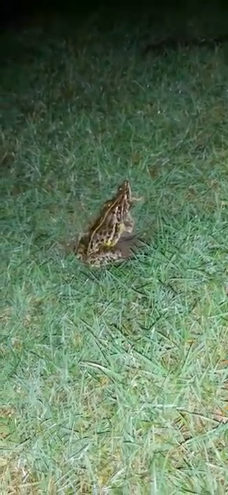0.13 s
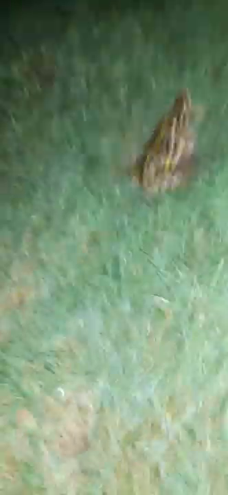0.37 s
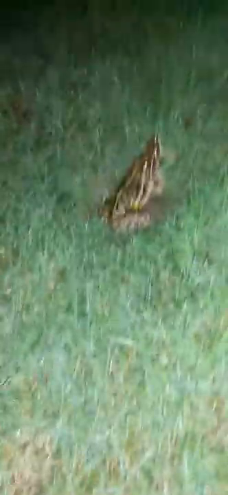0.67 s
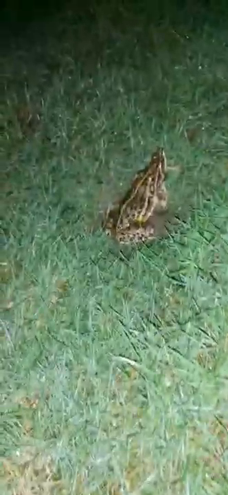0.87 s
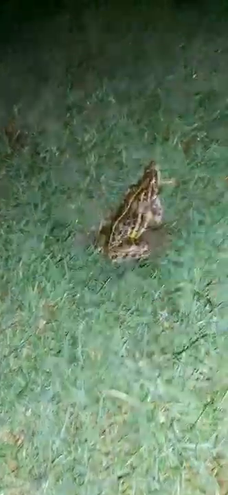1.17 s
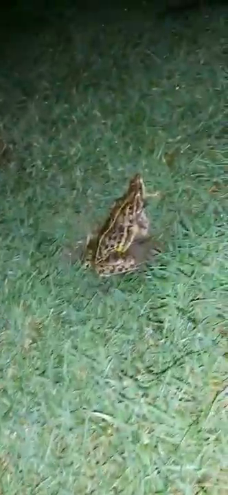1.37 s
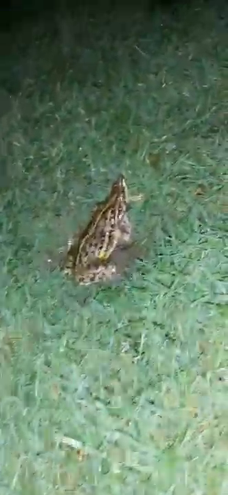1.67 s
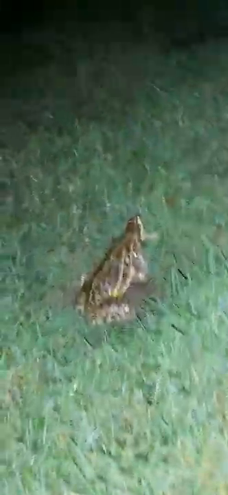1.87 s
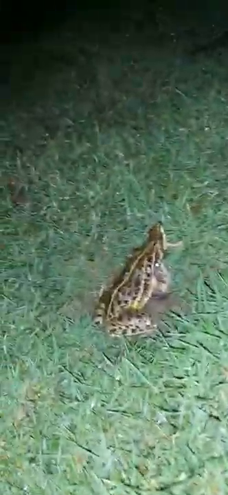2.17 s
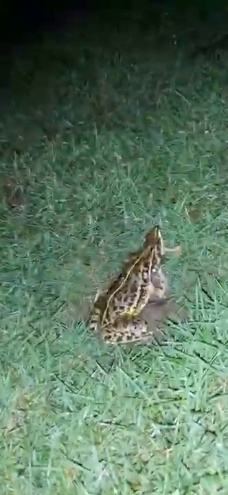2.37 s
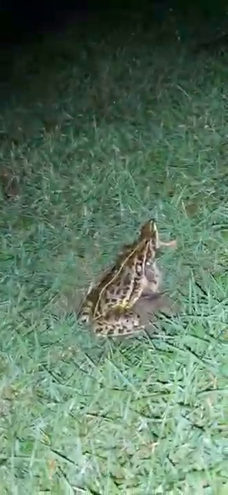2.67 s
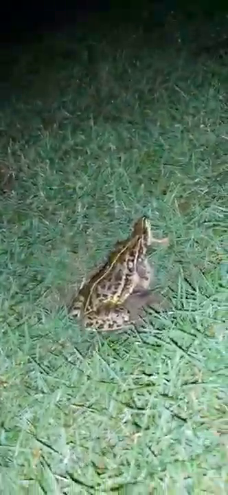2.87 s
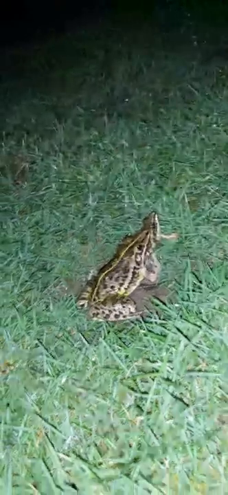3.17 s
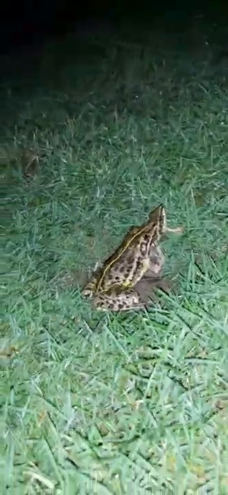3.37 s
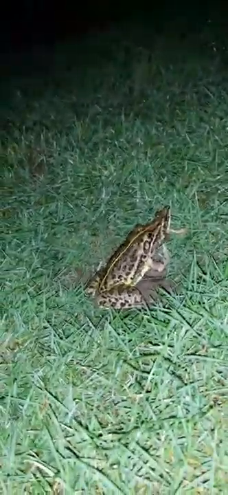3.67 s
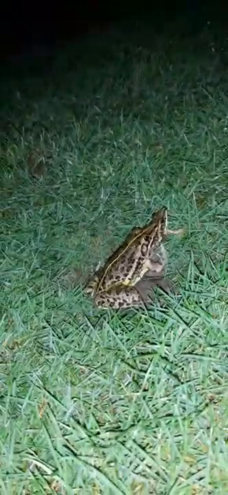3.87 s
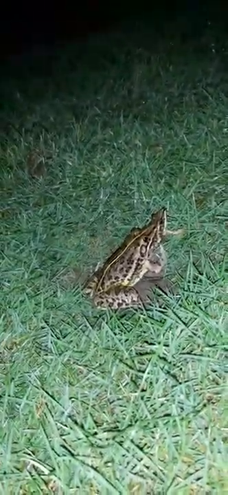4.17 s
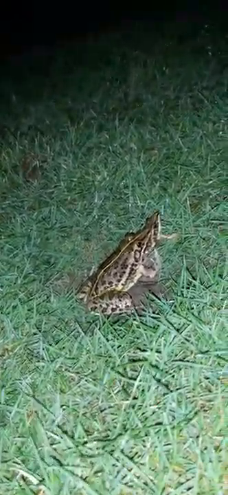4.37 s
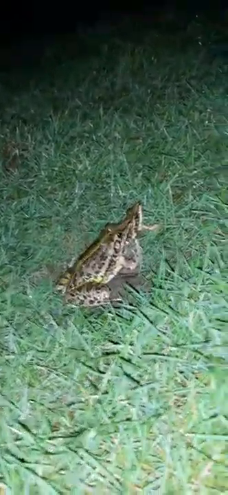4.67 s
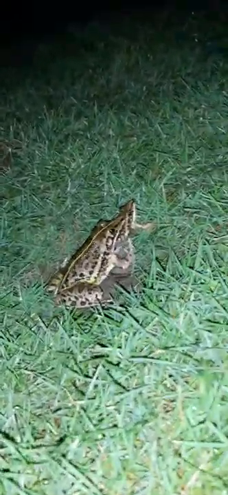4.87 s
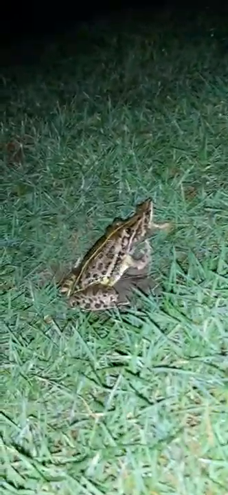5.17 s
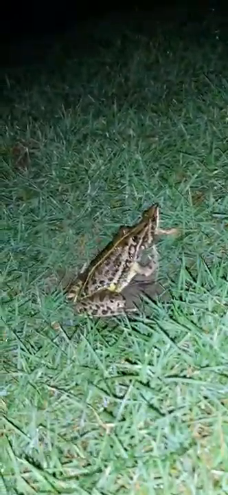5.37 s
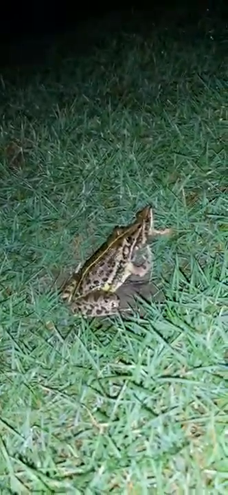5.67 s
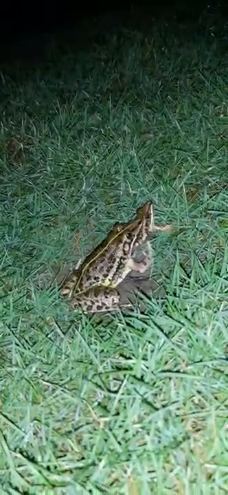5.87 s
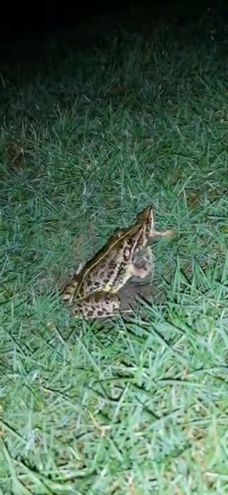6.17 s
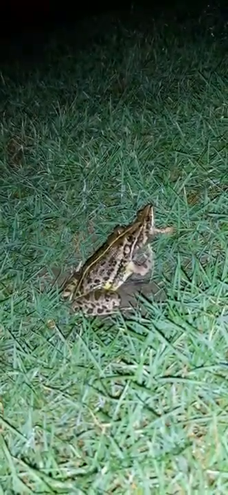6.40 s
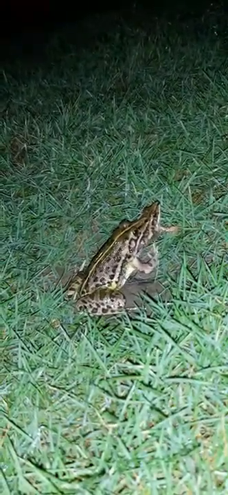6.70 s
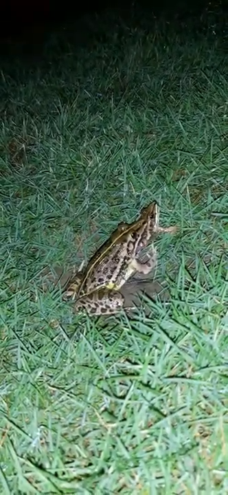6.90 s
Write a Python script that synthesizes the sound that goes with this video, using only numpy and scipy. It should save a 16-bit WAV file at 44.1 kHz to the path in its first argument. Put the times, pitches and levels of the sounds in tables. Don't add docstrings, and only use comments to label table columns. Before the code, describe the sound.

Close hand-held microphone in open night air. Continuous high cricket trilling, with a second insect scraping short chirps that start fast and faint, then slow and grow louder. A soft, wavering low drone and traffic rumble sit underneath. One faint grass tick comes early on. A frog lets out a brief, bright, rising squeak with creaky clicks around it, then a second, slightly lower one just before the end.

```python
import sys
import numpy as np
from scipy import signal
from scipy.fft import rfft, irfft
from scipy.io import wavfile
from scipy.ndimage import uniform_filter1d, map_coordinates

SR = 44100
rng = np.random.default_rng(int(sys.argv[2]) if len(sys.argv) > 2 else 0)


def waveform_to_disk(signal):
    frames = np.transpose(np.atleast_2d(signal))
    scaled = np.clip(frames, -1, 1) * 32767
    samples = np.round(scaled).astype(np.int16)
    wavfile.write(sys.argv[1], SR, samples)


N = 310464

# t/s, left minus right level for the crickets/dB, left lag/ms
PHONE_TURN = [
    (0, 3, -.012),
    (2.6, 4.5, 0),
    (3.2, 9, -.035),
    (4.5, 11, -.044),
    (7.04, 12, -.05),
]
# f/Hz, level per Hz/dB
AIR_SPECTRUM = [(25, -70), (45, -36), (71, -29), (120, 0), (187, -6.5), (280, 0.5), (400, -6.5),
                (900, -8.5), (1350, -20.5), (2000, -23), (3300, -23.5), (4600, -30.5), (6000, -34),
                (8500, -39), (15600, -40.5)]
# f/Hz, likeness/0-1
AIR_LIKENESS = [(60, 1), (300, 0.91), (640, 0.81), (1000, 0.03), (1500, 0.15), (15000, 0)]
# f/Hz, level/dB
AIR_LEAN = [(60, 0.5), (200, 4.5), (380, 1), (700, 1), (1290, -1), (2000, 0), (3100, 14.5), (4000, 1),
            (5900, 4), (8400, 3.5), (15000, 6.5)]
# t/s, level/dB
BREEZE_SWELL = [(0, 4.5), (0.39, 6.5), (0.75, -12), (1.13, 3.5), (1.76, 3), (2.1, -5), (2.7, -5),
                (2.9, 4.5), (3.2, 2), (3.35, -4), (3.55, 1.5), (4.05, -1), (4.5, 4), (5.25, -4), (5.67, 3),
                (6.06, -3.5), (6.6, 0.5), (7.04, -10)]
# f/Hz, width/Hz, level/dB
FAN_TONES = [(134.6, 1.4, -48), (268.3, 2.35, -46), (301.1, 0.76, -47.5), (326, 2.1, -49)]
# t/s, level/dB
FAN_WHINE = [(0, -44.5), (1.2, -50), (1.6, -63), (2.4, -45.5), (3.3, -51), (3.7, -50.5), (7.04, -51.5)]
# t/s, throb depth/dB, lag/share of the beat 0-1
CHORUS_STEP = [(0, 0, .1), (1, 2, 0.02), (2.5, 3, 0), (4, 2.5, .0), (4.6, 1.5, 0), (7.04, 2.5, 0.05)]
# t/s, tick pairs done/count
TICK_PACE = [(0.074, 0), (0.66, 6), (1.552, 15), (2.129, 21), (2.431, 24), (3.113, 31), (3.804, 38),
             (4.188, 42), (4.385, 44), (4.495, 45), (4.598, 46), (5.374, 54), (5.874, 59), (6.162, 62),
             (6.759, 68), (6.955, 70)]
# t/s, lag/s
ANSWER_LAG = [(0, 0.051), (.8, 0.076), (1.3, 0.025), (2, 0.02), (3.2, 0.039), (4.4, 0.064), (5.5, 0.045),
              (7.04, .055)]
# first stroke t/s, slow strokes begin t/s, last strong stroke t/s, peak level/dB
SLOWING_CHIRPS = [(0.264, 0.402, 0.496, -35.5), (0.946, 1.089, 1.149, -36), (1.605, 1.742, 1.799, -35.5),
                  (2.269, 2.4, 2.49, -36), (2.991, 3.121, 3.215, -34.5), (3.653, 3.783, 3.872, -34.5),
                  (4.386, 4.499, 4.561, -33.5), (5.037, 5.149, 5.234, -33), (5.729, 5.859, 5.918, -32.5),
                  (6.375, 6.506, 6.569, -32.5)]
# t/s, peak level/dB, left minus right level/dB
GRASS_BLADES = [
    (0.2897, -54, 9),
    (1.5459, -43, 3.0),
]
# t/s, click rate/Hz, effort level/dB, mouth opening/dB, mouth resonance f/Hz
FIRST_SQUEAK = [
    (2.778, 257, -39, -20, 5470),
    (2.789, 262, -36, 9.5, 6550),
    (2.8, 281.4, -32.5, -2, 7800),
    (2.83, 419, -30, 0.5, 8100),
    (2.865, 537, -26, 4.5, 8100),
    (2.91, 698, -24.5, 7.5, 7470),
    (2.932, 709, -23.5, 8, 6300),
    (2.952, 670, -24, 2, 4700),
    (2.985, 441, -41.5, -39, 4000),
]
SECOND_SQUEAK = [
    (6.845, 379, -34, -9, 6100),
    (6.86, 375, -32, 2.5, 6300),
    (6.88, 384, -31, 5.5, 6800),
    (6.925, 542, -27.5, 4, 6530),
    (6.965, 573, -25.5, 3.5, 5950),
    (6.99, 548, -26, -.5, 5520),
    (7.011, 495, -27, -8.5, 5300),
    (7.03, 454, -27, -21, 5200),
    (7.04, 460, -40, -20, 5200),
]
# far end t/s, near end t/s, near click rate/Hz, near level/dB, tightness/ratio
SHUT_CREAKS = [
    (2.64, 2.9, 268.3, -37, 0.96),
    (3.02, 2.9, 331, -33, 0.96),
    (6.69, 6.845, 367, -39, 1.08),
]
# f/Hz, width/Hz, level/dB
CHEST_HOLLOWS = [(2280, 410, 0), (2737, 650, -5), (4080, 1300, -20.5), (1540, 500, -13.5)]
# f/Hz, level/dB
FACING_PORT = [(3300, 1.5), (3800, -3), (4200, 6), (4700, 2.5), (5200, -0.5)]
# f/Hz, level/dB
SHADED_PORT = [(1400, -7), (2200, -5.5), (2900, 2), (3750, 8.5), (4450, 2), (5200, -26), (6000, -24),
               (7000, -19), (8300, -22), (9300, -5), (11000, -8), (15000, -9)]

AIR_DB, CHORUS_DB, DRONE_DB = -33.5, -54, -45
THROB_DB_PER_S, ROAR_DB_PER_S = 2.1, 0.42
RUMBLE_SHARE, HISS_SHADE = 0.15, -0.33
FAST_S, BRAKE_S, SLOW_S = .0173, .005, .03
BUILD_DB, AFTER_DB, UNEVEN_DB = -8, -13, 1.2
RING_HZ, RING_NARROWING, WIDEST_HZ = 1820, 0.63, 1900
FIRST_SNAP_DB, SECOND_SNAP_DB, SNAP_DB_PER_KHZ, SNAP_TOP_HZ, SNAP_SHUT = -43.5, -62, 9, 7150, .6
SNAP_DB_PER_OCTAVE = -2.5
TIGHTNESS = 0.99
CREAK_HZ, CREAK_FADE_DB, SHUT_DB, SHUT_HZ = 114, -14.5, -14, 3900


def gain_of(db):
    return 10 ** (np.asarray(db) / 20)


def evened(x):
    return x / np.sqrt(np.mean(x ** 2) + 1e-20)


def read(points, hz):
    f, value = np.transpose(points)
    return np.interp(np.log(hz + 1), np.log(f + 1), value)


def add(mix, s, sound):
    part = mix[..., max(round(s * SR), 0):][..., :sound.shape[-1]]
    part += sound[..., :part.shape[-1]]


def resonate(x, hz, width):
    turn = np.exp(2j * np.pi * np.cumsum(hz * np.ones(len(x))) / SR)
    r = np.exp(-np.pi * width / SR)
    return 2 * (turn * signal.lfilter([1 - r], [1, -r], x / turn)).real


def yard(x, t60, wet_db, gap, turn=1, lag=1):
    t, (s, lean_db, lag_ms) = np.arange(N) / SR, np.transpose(PHONE_TURN)
    shade_db = np.array([0 * t, -turn * np.interp(t, s, lean_db)]) + 2.0
    late = map_coordinates(x, [np.arange(N) - lag * np.interp(t, s, lag_ms) * SR / 1000], order=3)
    age = np.arange(SR // 2) / SR
    taps = rng.standard_normal((2, len(age))) * (rng.random((2, len(age))) < .05)
    taps *= gain_of(-60 * age / t60) * (age > gap)
    wet = signal.fftconvolve(x[None], taps / np.linalg.norm(taps[0]), axes=1)[:, :N]
    return np.array([late, x]) * gain_of(shade_db) + gain_of(wet_db) * wet * gain_of(shade_db / 2)


def night_air():
    frames, hz = N // 256 + 5, np.fft.rfftfreq(1024, 1 / SR)
    a, b, c, d, patches = rng.standard_normal((frames, 513, 5)).T
    patches = evened(uniform_filter1d(uniform_filter1d(patches, 10, 0), 14, 1))
    t = np.arange(frames) * 256 / SR
    turned = np.interp(t, *np.transpose(PHONE_TURN)[:2])
    swell_db = np.array([
        THROB_DB_PER_S * (t - t.mean()),
        RUMBLE_SHARE * np.interp(t, *np.transpose(BREEZE_SWELL)),
        ROAR_DB_PER_S * (t - t.mean()),
        HISS_SHADE * (turned - turned.mean())])
    shares = np.array([read(list(zip((75, 150, 700, 5000), row)), hz) for row in np.eye(4)]) * (hz > 50)
    same = np.clip(read(AIR_LIKENESS, hz), -1, 1)[:, None]
    left = a + 1j * b
    z = np.array([left, same * left + np.sqrt(1 - same ** 2) * (c + 1j * d)])
    z *= gain_of(read(AIR_SPECTRUM, hz)[:, None] + 0.54 * patches + shares.T @ swell_db)
    z *= gain_of(np.multiply.outer([0, -1], read(AIR_LEAN, hz)))[..., None]
    return gain_of(AIR_DB - 2.0) * evened(signal.istft(z, nperseg=1024, noverlap=768)[1][:, :N])


def fans():
    t, tones = np.arange(N) / SR, np.zeros(N)
    for hz, width, db in FAN_TONES:
        stirred = resonate(resonate(rng.standard_normal(N), hz, width), hz, 3 * width)
        tones += gain_of(db) * evened(1.94 * np.sin(2 * np.pi * hz * t) + evened(stirred))
    whine_db = np.interp(t, *np.transpose(FAN_WHINE))
    tones += gain_of(whine_db) * np.sqrt(2) * np.sin(2 * np.pi * 401.5 * t)
    drone_db = np.interp(t, *np.transpose(BREEZE_SWELL)) + DRONE_DB
    tones += gain_of(drone_db) * np.sqrt(2) * np.sin(2 * np.pi * 163.3 * t)
    return tones * gain_of([[1.3], [-1.3]])


def stroke(from_hz, to_hz, length, overtone_db=-60):
    turns = np.cumsum(np.linspace(from_hz, to_hz, round(length * SR))) / SR
    overtone = gain_of(overtone_db) * np.sin(2 * 2 * np.pi * turns)
    return np.hanning(len(turns)) * (np.sin(2 * np.pi * turns) + overtone)


def ticks():
    s, done = np.transpose(TICK_PACE)
    return np.interp(np.arange(done[-1] + 1), done, s)


def chorus(count=32):
    out = np.zeros(N)
    for pace, start, pitch, far in rng.random((count, 4)):
        beats = np.zeros(N)
        beats[(np.arange(.1 * start, N / SR, .092 + .012 * pace) * SR).astype(int)] = 1
        wing = stroke(7050 + 1500 * pitch, 6250 + 1500 * pitch, .012)
        pair = np.concatenate([.6 * wing, np.zeros(round(.0045 * SR)), wing])
        out += gain_of(-6 * far - 19 * abs(pitch - .36)) * signal.oaconvolve(beats, pair)[:N]
    t, (s, depth_db, lag) = np.arange(N) / SR, np.transpose(CHORUS_STEP)
    near = ticks()
    beat = np.interp(t, np.r_[near[0] - .098, near, near[-1] + .098], np.arange(len(near) + 2))
    throb_db = np.interp(t, s, depth_db) * np.cos(2 * np.pi * (beat - np.interp(t, s, lag)))
    return gain_of(CHORUS_DB) * evened(gain_of(throb_db) * yard(out, t60=.3, wet_db=6, gap=.002))


def ticker(times, top_hz, low_hz, db, spread_db, wet_db):
    out, chance = np.zeros(N), rng.standard_normal((len(times), 3))
    for s, (loud, first, pitch) in zip(times, chance):
        wing = stroke(top_hz + 40 * pitch, low_hz + 40 * pitch, 0.0147)
        add(out, s - .0065, gain_of(db + spread_db * loud) * wing)
        add(out, s - .0065 - .0165, gain_of(db - 4.5 + 1.5 * first) * wing)
    return yard(out, .3, wet_db, .004)


def neighbours():
    beats = ticks()
    lag = np.interp(beats, *np.transpose(ANSWER_LAG))
    answers = beats + lag + .004 * rng.standard_normal(len(beats))
    near = ticker(beats, top_hz=7850, low_hz=6800, db=-41.3, spread_db=1.0, wet_db=-8)
    return near + ticker(answers, top_hz=7300, low_hz=6600, db=-48, spread_db=1.5, wet_db=-1)


def chirp_strokes(first, turn, last, db):
    k = np.arange(round((turn - first) / FAST_S) - 1, 0, -1)
    fast = turn - FAST_S * k - BRAKE_S * (2 - 2. ** (1 - k)) * 3 / 4
    slow = np.linspace(turn, last, round((last - turn) / SLOW_S) + 1)
    s = np.r_[fast, slow, last + SLOW_S]
    level = db + BUILD_DB * np.clip((slow[1] - s) / (slow[1] - first), 0, 1) + AFTER_DB * (s > last)
    return s, level + UNEVEN_DB * rng.standard_normal(20)[:len(s)]


def scraper():
    out = np.zeros(N)
    for row in SLOWING_CHIRPS:
        times, levels = chirp_strokes(*row)
        for k in (1, 2, 3):
            wing = stroke(5230 - 40 * k, 4950 - 40 * k, .009, overtone_db=-16)
            for back in (0, .0085):
                add(out, times[0] - FAST_S * k - .004 + back, gain_of(row[3] + BUILD_DB - 1 - 2.6 * k) * wing)
        for s, db in zip(times, levels):
            age = min((s - times[0]) / 0.21, 1)
            hz = 5130 + 160 * age
            wing = stroke(hz + 170, hz - 170, .008, overtone_db=-16 - 15 * age)
            add(out, s - .004, gain_of(db + 0.2) * wing)
            wing_back = stroke(hz + 30 - 170 * age, hz - 270 - 190 * age, .0095)
            add(out, s + .0045, gain_of(db - 0.8 - 8 * age) * wing_back)
    return yard(out, t60=0.45, wet_db=-4, gap=0.005, turn=1.6, lag=0)


def grass():
    out, t = np.zeros((2, N)), np.arange(120) / SR
    for (s, db, pan_db), hz in zip(GRASS_BLADES, rng.uniform(6000, 10000, len(GRASS_BLADES))):
        level_db = db + np.array([[pan_db / 2], [-pan_db / 2]]) - 60 * t / .0015
        add(out, s, gain_of(level_db) * np.sin(2 * np.pi * hz * t))
    return out


def squeak(rows, top_db, tight, rough=.009):
    s, *columns = np.transpose(rows)
    t = np.arange(s[0], s[-1] + .006, 1 / SR)
    rate_hz, chest_db, open_db, mouth_hz = (np.interp(t, s, c) for c in columns)
    mouth_db = chest_db + open_db
    width = np.minimum(RING_HZ * gain_of(-RING_NARROWING * open_db), WIDEST_HZ)
    snap_db = top_db + SNAP_DB_PER_KHZ * np.minimum(mouth_hz - SNAP_TOP_HZ, 0) / 1000
    snap_db += SNAP_SHUT * np.minimum(open_db, 0) + SNAP_DB_PER_OCTAVE * np.log2(rate_hz / 300)

    wobble = evened(uniform_filter1d(rng.standard_normal(len(t)), 80))
    turns = np.cumsum(rate_hz * (1 + rough * wobble) * (t < s[-1])) / SR
    at = np.interp(np.arange(.5, turns[-1]), turns, np.arange(len(t)))
    size = gain_of(.5 * rng.standard_normal(len(at))) / np.sqrt(rate_hz[at.astype(int)] / SR)
    clicks = (np.sinc(np.arange(len(t)) - at[:, None]) * size[:, None]).sum(0)
    puffs = evened(rng.standard_normal(len(t)) * np.exp(-((turns - .5) % 1) / 0.5))

    def ring(hz, w, skirt, hiss=.1):
        return resonate(resonate(clicks + hiss * puffs, hz, w), hz, skirt) / np.sqrt(np.pi * w / SR)

    chest = np.zeros(len(t))
    for k, (hz, w, db) in enumerate(CHEST_HOLLOWS):
        chest += (-1) ** k * gain_of(db) * ring(tight * hz, w, 1.6 * w, hiss=.03)
    rings = np.array([ring(mouth_hz, w, 1.4 * w) for w in (500, 1000, 2000, 4000)])
    mouth = map_coordinates(rings, [np.log2(np.clip(width, 500, 4000) / 500), np.arange(len(t))], order=1)
    mouth -= gain_of(-12) * ring(np.minimum(5100, 0.87 * mouth_hz), 2300, 2900)
    mouth = signal.sosfilt(signal.butter(6, 9000, output="sos", fs=SR), mouth)
    snap = ring(10000, 1500, 2400, hiss=.4)
    snap -= gain_of(-9) * ring(12100, 1400, 2000, hiss=.4)
    snap -= gain_of(-9) * ring(15100, 1200, 1800, hiss=.4)
    voice = gain_of(chest_db - 3.5) * chest + gain_of(mouth_db + 2.5) * mouth + gain_of(snap_db + 2.0) * snap

    hz = np.fft.rfftfreq(len(t), 1 / SR)
    left = irfft(rfft(voice) * gain_of(read(FACING_PORT, hz)), len(t))
    later = np.exp(-2j * np.pi * hz * .00008)
    right = irfft(rfft(voice) * gain_of(read(SHADED_PORT, hz)) * later, len(t))
    return s[0], np.array([left, right])


def creak(far, near, rate_hz, db, tight):
    slow_end = (far, CREAK_HZ, db + CREAK_FADE_DB, SHUT_DB, SHUT_HZ)
    middle = ((far + 2 * near) / 3, (CREAK_HZ + rate_hz) / 2, db, SHUT_DB, SHUT_HZ)
    squeak_end = (near, rate_hz, db - 2, SHUT_DB + 9, SHUT_HZ)
    return squeak(sorted([slow_end, middle, squeak_end]), SECOND_SNAP_DB, tight)


def animal():
    out = np.zeros((2, N))
    add(out, *squeak(FIRST_SQUEAK, FIRST_SNAP_DB, TIGHTNESS))
    add(out, *squeak(SECOND_SQUEAK, SECOND_SNAP_DB, TIGHTNESS))
    for row in SHUT_CREAKS:
        add(out, *creak(*row))
    return out


def scene():
    return night_air() + fans() + chorus() + neighbours() + scraper() + grass() + animal()


def roll_off(x):
    return signal.sosfilt(signal.butter(12, 15700, fs=SR, output="sos"), x)


def record(dry):
    cut = signal.sosfilt(signal.butter(3, 42, "highpass", output="sos", fs=SR), dry)
    top_cut = signal.firwin(401, 16000, window=("kaiser", 9), fs=SR)
    mix = signal.oaconvolve(cut, top_cut[None], "same")
    return roll_off(mix)


dry = scene()
out = record(dry)
waveform_to_disk(out)
```